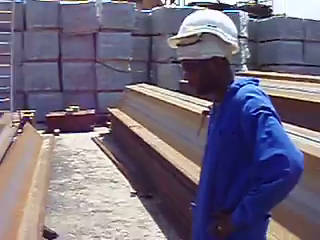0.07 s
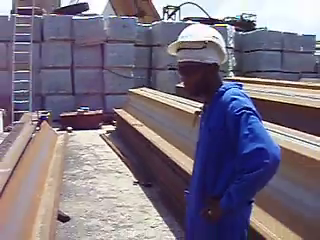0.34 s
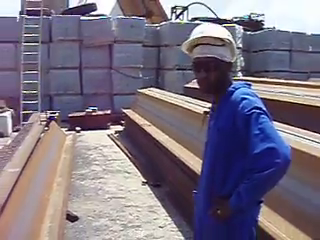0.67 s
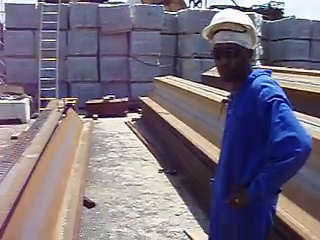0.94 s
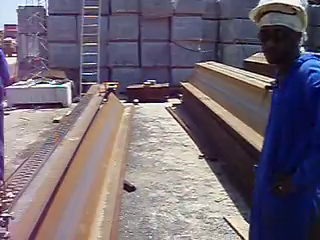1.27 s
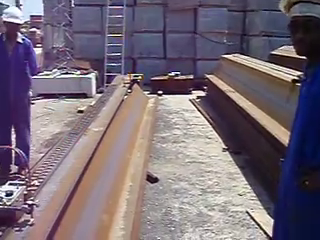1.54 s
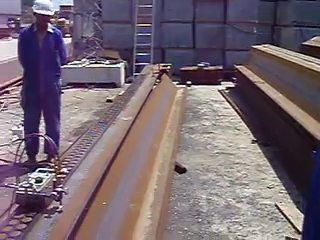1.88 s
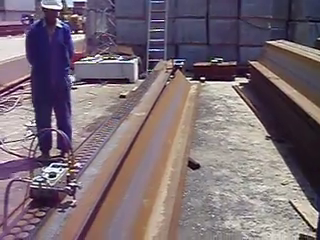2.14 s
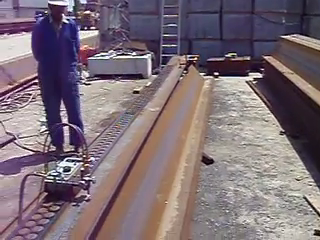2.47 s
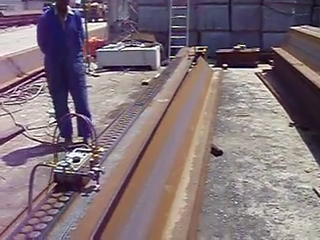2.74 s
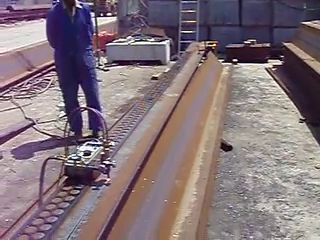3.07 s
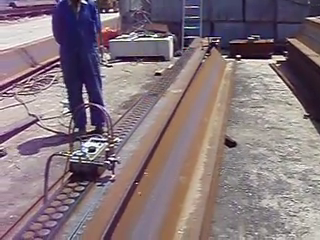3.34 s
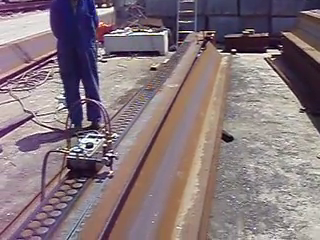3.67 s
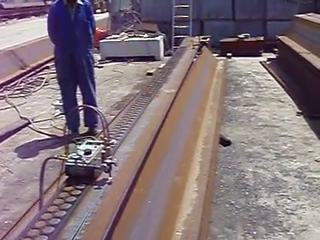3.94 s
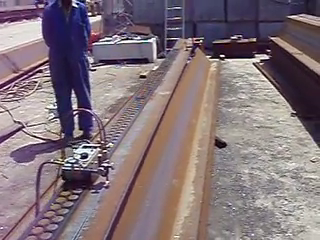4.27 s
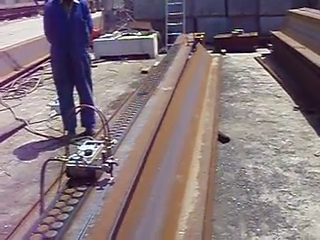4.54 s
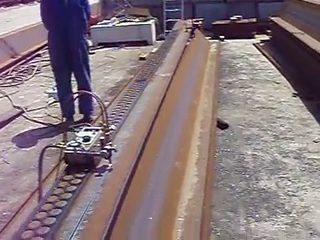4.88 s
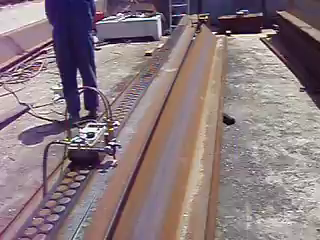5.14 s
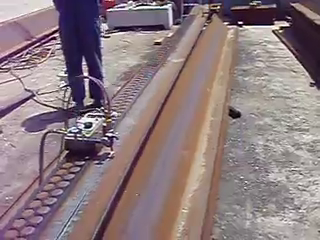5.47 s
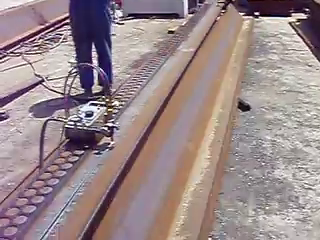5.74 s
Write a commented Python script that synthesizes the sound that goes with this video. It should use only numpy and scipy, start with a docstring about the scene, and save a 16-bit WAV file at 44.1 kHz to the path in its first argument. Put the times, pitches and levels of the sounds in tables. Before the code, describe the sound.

Loud, whistling hiss of a gas torch cutting a steel beam, sputtering and spitting over a faint flame roar and light wind bumps.

```python
"""Cutting a steel beam with a gas torch

Outdoors, a few metres away, a torch on a track cuts steel. Its oxygen jet hisses near 3.6 kHz over a
roaring flame and sputters about sixty times a second, blowing out melted metal. Now and then the jet
spits or slag (melted waste) pops. Wind bumps the microphone, yard machines hum, and a low rush passes
once. The recorder keeps only low and middle pitches and overloads on the sharpest peaks."""
import sys
import numpy as np
from scipy import signal
from scipy.fft import rfft, irfft, next_fast_len
from scipy.io import wavfile
from scipy.ndimage import uniform_filter1d

SR = 44100
rng = np.random.default_rng(int(sys.argv[2]) if len(sys.argv) > 2 else 0)


def persist_wave(psi):
    """Save psi, clipped to +-1, as 16-bit WAV."""
    counts = np.round(np.clip(psi, -1, 1) * 32767).astype(np.int16)
    wavfile.write(sys.argv[1], SR, np.atleast_2d(counts).T)


N = 255956
TIME = np.arange(N) / SR
FFT_SIZE = next_fast_len(N, True)
FREQS = np.fft.rfftfreq(FFT_SIZE, 1 / SR)

# Levels in the tables are relative: 0 dB leaves a sound as it is, and lower is quieter.
# tone of the jet's hiss: f/Hz, level/dB
HISS_SPECTRUM = [(1900, -39), (2250, -26), (2540, -16.5), (2720, -9.5), (2900, -11), (3100, -5), (3350, -2),
                 (3720, 0), (3850, -6), (4000, -25.5), (4200, -14), (4350, -16), (4600, -21)]
# the jet's one flare-up: t/s, half length/s, level/dB
JET_FLARE = (4.16, 0.075, 2.8)
# how far the listener has turned towards the torch: t/s, share (0 to 1)
LISTENER_TURN = [(0, 0.06), (1.3, .05), (2.2, .45), (3.8, .6), (4.6, 0.95), (5.8, 0.7)]
# pitches at which the cut rings: f/Hz, width/Hz, level/dB
CUT_RESONANCES = [(1250, 110, -4.5), (1513, 230, 1.5), (1820, 325, 9), (2000, 110, -3.5), (2690, 230, 4.5),
                  (2920, 280, 6.5), (4040, 500, 2.5)]
# tone of the flame from beside the beam: f/Hz, level/dB
FLAME_BESIDE = [(250, -20.5), (400, -5), (550, -7.5), (760, -3.5), (860, -1), (960, 4.5), (1030, -11.5),
                (1150, 1.5), (1400, 7), (2400, -9)]
# tone of the flame from in line with the beam: f/Hz, level/dB
FLAME_IN_LINE = [(250, -12), (400, -6.5), (540, -9.5), (690, 1), (850, -3), (1000, -9), (1120, 1),
                 (1230, 4.5), (1500, 2), (2400, -13)]
# hum of the yard's machines: f/Hz, width/Hz, level/dB
MACHINE_RESONANCES = [(165, 43, -6.5), (230.4, 47, 1.5), (360, 74, -7)]
# tone of the wind's rumble: f/Hz, level/dB
WIND_SPECTRUM = [(15, -33), (40, -4), (90, 0), (160, 1.5), (260, -8.5), (400, -8.5), (700, -29.5),
                 (1200, -44.5)]
# gusts on the microphone: t/s, half length/s, level/dB
WIND_GUSTS = [(0.225, 0.067, -40), (1.019, 0.17, -37), (1.312, .18, -36.5), (1.607, .045, -29),
              (1.936, 0.12, -40.5), (3.897, .25, -46), (4.697, 0.12, -47.5)]
# the jet's strongest spits: t/s, level/dB
JET_SPITS = [(0.037, -.5), (0.062, -2.5), (0.178, -2), (0.284, -2), (0.438, 0.5), (0.454, 0), (0.546, -0.5),
             (0.69, -1), (1.109, -0.4), (1.25, 1), (1.299, -2.6), (1.511, -1.3), (1.698, 0.5),
             (2.083, -1.3), (2.273, 1.5), (2.308, -1.3), (2.458, -2.5), (2.833, 0), (3.024, 0.5),
             (3.041, 0.5), (3.361, 0.5), (3.502, -2), (3.556, 0.5), (3.906, 0), (4.151, 4), (4.259, 1),
             (4.341, -0.3), (4.456, 1.5), (4.725, -1.5), (5.155, 1), (5.287, 2.3), (5.382, -0.5)]
# pops of slag: t/s, level/dB, f/Hz
SLAG_POPS = [(0.214, -7, 1900), (0.47, -11, 1710), (0.687, -22, 1810), (0.795, -20.5, 1410),
             (1, -12.5, 1910), (3.023, -12.5, 1700), (4.534, -15.5, 1173), (5.111, -11.5, 1760)]
# wind bumps on the microphone: t/s, level/dB, fade time/s, upper edge f/Hz
WIND_BUMPS = [(0.617, -17, 0.0011, 560), (0.985, -23.5, 0.0084, 259), (1.045, -21, 0.0057, 260),
              (1.609, -14, 0.0069, 441), (1.651, -21.5, 0.0069, 277), (1.875, -25, 0.0081, 451)]
# tone of the brief low rush: f/Hz, level/dB
RUSH_SPECTRUM = [(80, -21.5), (160, 1.5), (450, -0.5), (950, 2), (1300, -11), (2000, -27)]
# how well the recorder lets each pitch through: f/Hz, level/dB
RECORDER_RESPONSE = [(10, -16.5), (35, -1), (4320, 1), (4440, -9), (4560, -15.5), (4680, -29),
                     (5200, -55.5), (7000, -84)]


def from_db(db):
    """Turns decibels into a number to multiply by."""
    return 10 ** (np.asarray(db) / 20)


def unit(x):
    """Scales a signal to an average size (rms) of one."""
    return x / np.sqrt(np.mean(x ** 2) + 1e-20)


def white():
    """White noise: equally strong at all frequencies."""
    return rng.standard_normal(N)


def filtered(x, gain):
    """Turns each frequency up or down by its own gain."""
    return irfft(rfft(x, FFT_SIZE) * gain, FFT_SIZE)[:N]


def colour(x, spectrum):
    """Shapes a sound's tone to follow a table of frequencies and levels."""
    hz, db = np.transpose(spectrum)
    return filtered(x, from_db(np.interp(np.log(FREQS + 1), np.log(hz), db)))


def ring(x, resonances):
    """Makes a sound ring around a few steady pitches."""
    peaks = (from_db(db) / (1 + 2 * ((FREQS - hz) / width) ** 2) for hz, width, db in resonances)
    return filtered(x, np.sqrt(sum(peak ** 2 for peak in peaks)))


def resonate(x, hz, width_hz):
    """Makes a sound ring around one moving pitch."""
    spin = np.exp(2j * np.pi * np.cumsum(hz) / SR)
    decay = np.exp(-np.pi * width_hz * np.pi / 2 / SR)
    # shift that pitch down to 0 Hz, smooth, and shift back
    smoothed = signal.lfilter([(1 - decay) ** 2], [1, -2 * decay, decay ** 2], x / spin)
    return (spin * smoothed).real


def drift(hz):
    """A smooth random wobble, up to about hz times a second."""
    return unit(filtered(white(), np.exp(-np.minimum(FREQS / hz, 10) ** 2)))


def swell(s, half_s):
    """Rises smoothly to one at time s, then falls."""
    return np.exp(-np.minimum(abs(TIME - s) / half_s, 10) ** 2)


def add(mix, s, sound):
    """Mixes a sound in at time s."""
    part = mix[max(round(s * SR), 0):][:len(sound)]
    part += sound[:len(part)]


def slag_beats(rate_hz=62, wander=.07, jitter=.14, spread_db=2.5):
    """One click each time the jet blows a melted bead out of the cut, in a loose rhythm."""
    cycles = np.cumsum(rate_hz * (1 + wander * drift(3))) / SR + jitter * drift(45)
    bead_count = np.floor(np.maximum.accumulate(cycles))
    clicks = np.diff(bead_count, prepend=bead_count[0])
    return clicks * from_db(spread_db * np.clip(drift(180), -2, 2))


def jet_hiss(beats, turn, surge_s=0.0018, whistle_hz=3593, sag_hz=110, waver_hz=30):
    """Swirling oxygen hisses and whistles. It flutters, and surges with every bead."""
    t = np.arange(-(SR // 100), SR // 100) / SR
    surges = signal.oaconvolve(beats, np.exp(-(t / surge_s) ** 2), "same")
    flow = (1 + 0.5 * surges) * from_db(0.8 * drift(110))
    flare_s, flare_half_s, flare_db = JET_FLARE
    flare = swell(flare_s, flare_half_s)
    pitch = whistle_hz - sag_hz * flare + waver_hz * drift(18)  # drops while the jet flares
    whistle = unit(resonate(colour(flow * white(), HISS_SPECTRUM), pitch, width_hz=135))
    # from beside the beam, the lower part of the hiss is fuller
    low_hiss = (1 - turn) * unit(ring(flow * white(), [(2750, 900, 0)]))
    hiss = unit(colour(flow * white(), HISS_SPECTRUM))
    blend = unit(hiss + from_db(-2.5) * whistle + from_db(-12) * low_hiss)
    return from_db(-14 + 0.92 * turn + flare_db * flare) * blend


def cut_sputter(beats, turn, puff_s=0.00065, dull_hz=2800, beside_db=-26, in_line_db=-29):
    """Each bead's click and tiny puff ring the cut, over a duller steady rush through it."""
    puff_shapes = signal.lfilter([1], [1, -np.exp(-1 / (puff_s * SR))], beats)
    steady = filtered(white(), 1 / (1 + (FREQS / dull_hz) ** 4))
    drive = unit(beats) + from_db(-5) * unit(puff_shapes * white()) + from_db(4.5) * steady
    level_db = np.interp(turn, [0, 0.54], [beside_db, in_line_db]) + 1.2 * drift(2.6)
    return from_db(level_db) * unit(ring(drive, CUT_RESONANCES))


def flame_roar(turn, flutter_db=3.5):
    """The heating flame burns with a flutter; its tone changes as the listener turns."""
    beside = from_db(-32.5) * unit(colour(white(), FLAME_BESIDE))
    in_line = from_db(-32) * unit(colour(white(), FLAME_IN_LINE))
    return ((1 - turn) * beside + turn * in_line) * from_db(flutter_db * drift(99))


def yard_hum(ease_at_s=5.0, ease_length_s=.2, drop_db=6):
    """Distant machines drone, then ease off."""
    eased = np.clip((TIME - ease_at_s) / ease_length_s, 0, 1)
    return from_db(-45.5 - drop_db * eased) * unit(ring(white(), MACHINE_RESONANCES))


def wind_rumble(breeze_db=-49, lumps_db=1.7):
    """Air rumbles unevenly past the microphone: a light breeze, plus gusts."""
    gust_power = sum((from_db(db) * swell(s, half_s)) ** 2 for s, half_s, db in WIND_GUSTS)
    rumble = unit(colour(white(), WIND_SPECTRUM) * from_db(lumps_db * drift(27)))
    return np.sqrt(from_db(breeze_db) ** 2 + gust_power) * rumble


def jet_spits(hz=3500, spread_hz=160, glide_hz=250, half_s=0.0011, choke_s=0.0024, faint_count=20):
    """The jet chokes, then chirps. Returns the chirps and the share of hiss they push aside."""
    chirps, share = np.zeros(N), np.zeros(N)
    t = np.arange(-(SR // 100), SR // 100) / SR
    shape = np.exp(-(t / half_s) ** 2)
    choke = 0.17 * np.exp(-(2 * t / choke_s + 2) ** 2)
    faint_spits = [(s, -3.0) for s in rng.random(faint_count) * N / SR]
    for s, db in list(JET_SPITS) + faint_spits:
        detune, glide, phase = rng.uniform(-1, 1, 3)
        pitch = hz + spread_hz * detune + glide_hz * glide * np.tanh(t / half_s)
        tone = np.sin(2 * np.pi * np.cumsum(pitch) / SR + np.pi * phase)
        add(chirps, s + t[0], from_db(db - 0.52) * shape * tone)
        add(share, s + t[0], shape + choke)
    return chirps, np.minimum(share, 1)


def slag_pops(rise_s=0.00029):
    """Larger beads of slag burst with a short, pitched tick."""
    out, t = np.zeros(N), np.arange(SR // 100) / SR
    shape = t / rise_s * np.exp(1 - t / rise_s)
    for s, db, hz in SLAG_POPS:
        add(out, s, from_db(db) * shape * np.sin(2 * np.pi * hz * t))
    return out


def wind_bumps(low_hz=85, ragged=0.67):
    """Wind hits the microphone: one low push, then a ragged, fading puff."""
    out, t = np.zeros(N), np.arange(SR // 8) / SR
    for s, db, fade_s, top_hz in WIND_BUMPS:
        band = signal.butter(2, [low_hz, top_hz], "bandpass", fs=SR, output="sos")
        push = signal.sosfilt(band, signal.unit_impulse(len(t), SR // 500))
        puff = signal.sosfilt(band, rng.standard_normal(len(t)) * t / fade_s * np.exp(-t / fade_s))
        bump = push / abs(push).max() + ragged * puff / abs(puff).max()
        add(out, s, from_db(db) * bump / abs(bump).max())
    return out


def low_rush(peak_s=4.24, half_s=.07):
    """A soft, low rush swells and fades once."""
    noise = unit(colour(white(), RUSH_SPECTRUM))
    return from_db(-35) * noise / (1 + ((TIME - peak_s) / half_s) ** 2)


def scene():
    """Torch, yard and wind meet at one microphone."""
    turn = np.interp(TIME, *np.transpose(LISTENER_TURN))
    beats = slag_beats()
    chirps, spit_share = jet_spits()
    jet = jet_hiss(beats, turn) * (1 - spit_share) + chirps
    sputter = cut_sputter(beats, turn) * (1 + spit_share ** 2)  # harder whenever the jet spits
    torch = jet + sputter + slag_pops() + flame_roar(turn)
    return (torch + low_rush() + yard_hum() + wind_rumble() + wind_bumps())[None]


def record(dry, threshold=0.57, squeeze=0.62, ceiling=.71, lopsided=0.019, top_hz=15900):
    """The recorder turns loud peaks down, cuts the treble and flattens peaks that are still too big."""
    envelope = abs(signal.hilbert(dry[0], FFT_SIZE)[:N])  # the outline of the wave
    overload = np.maximum(envelope / threshold, 1)
    limited = dry[0] / uniform_filter1d(overload, size=30) ** squeeze
    narrowed = colour(limited, RECORDER_RESPONSE)
    clipped = np.clip(narrowed, -ceiling - lopsided, ceiling - lopsided)
    low_pass = signal.firwin(511, top_hz, window=("kaiser", 9), fs=SR)
    return signal.oaconvolve(clipped, low_pass, "same")[None]


dry = scene()
out = record(dry)
persist_wave(out)
```